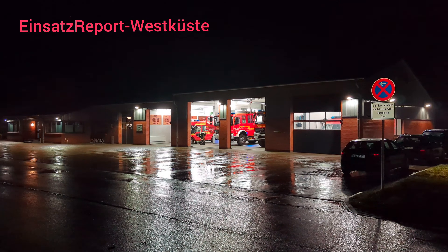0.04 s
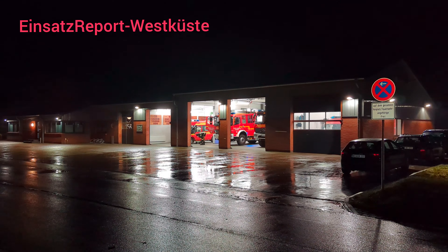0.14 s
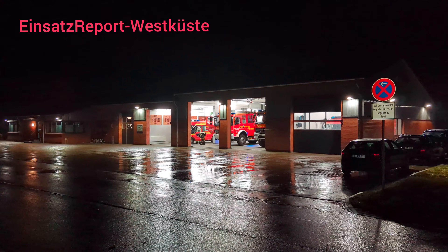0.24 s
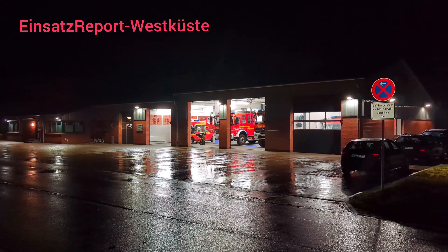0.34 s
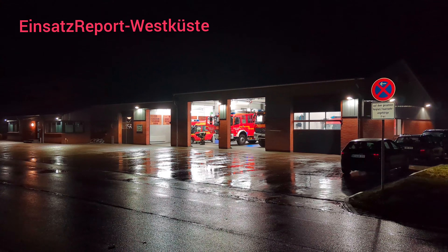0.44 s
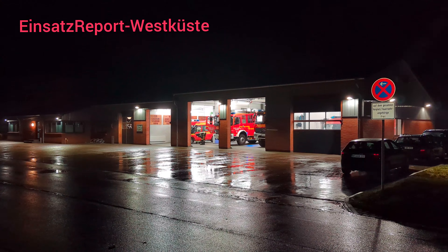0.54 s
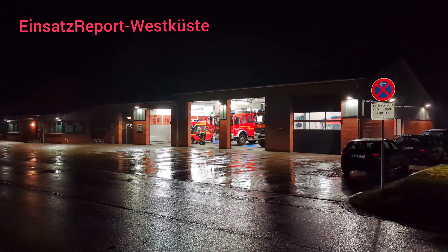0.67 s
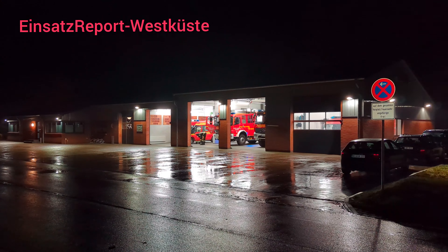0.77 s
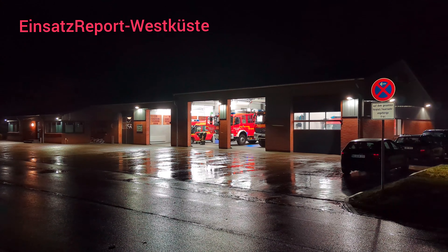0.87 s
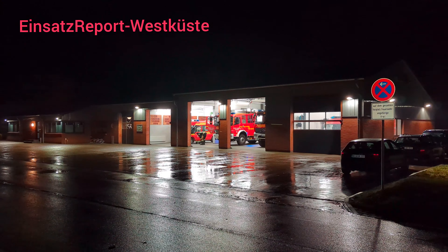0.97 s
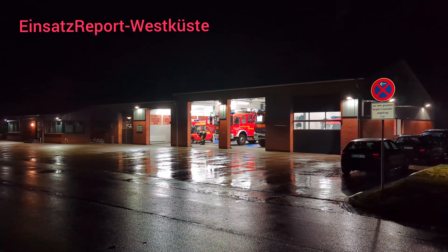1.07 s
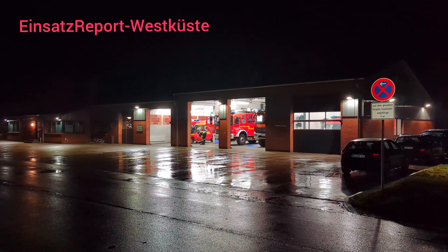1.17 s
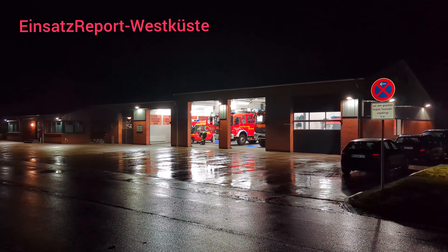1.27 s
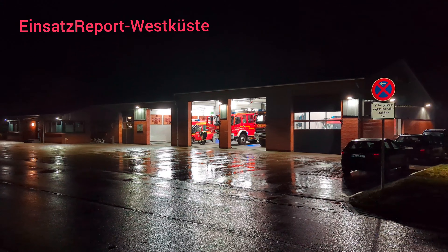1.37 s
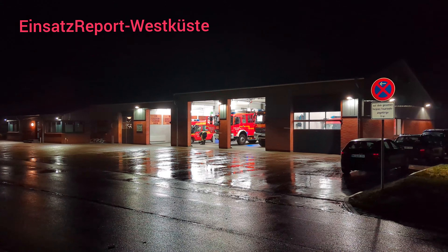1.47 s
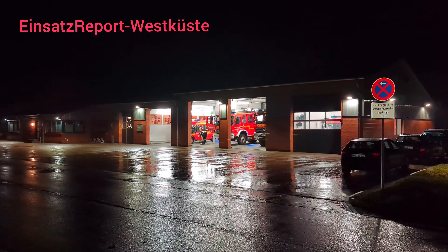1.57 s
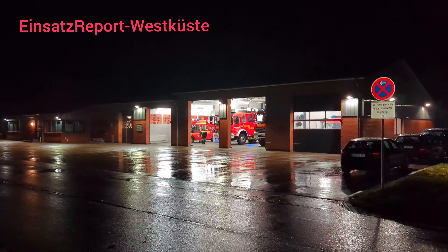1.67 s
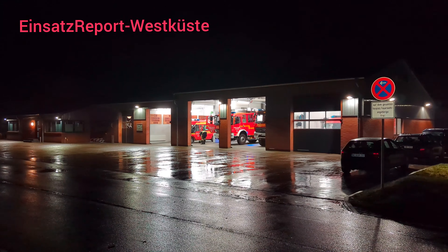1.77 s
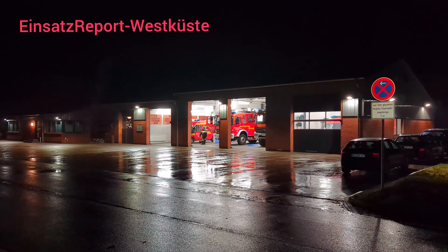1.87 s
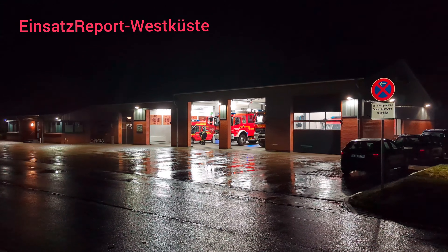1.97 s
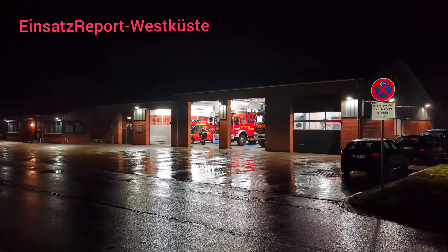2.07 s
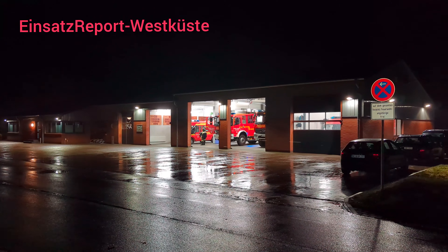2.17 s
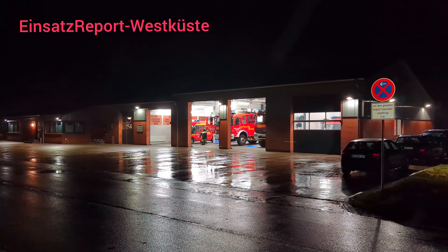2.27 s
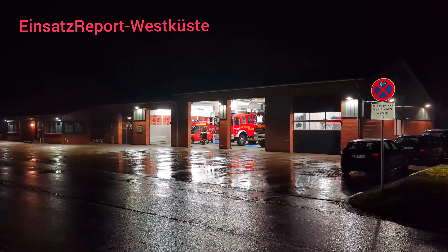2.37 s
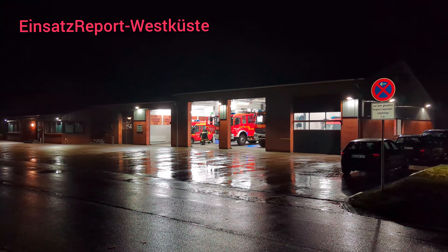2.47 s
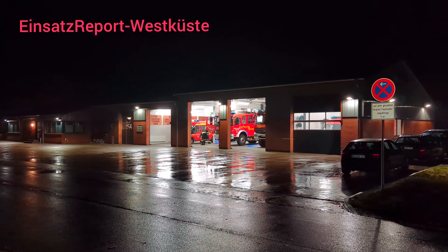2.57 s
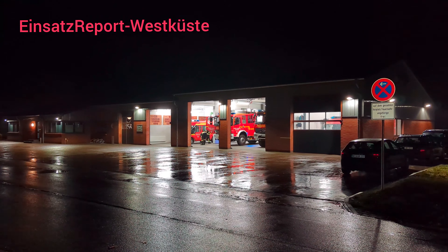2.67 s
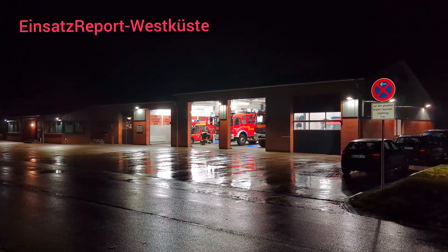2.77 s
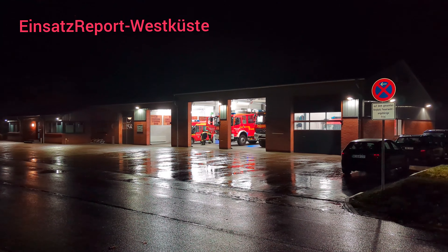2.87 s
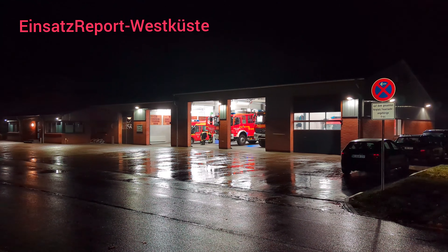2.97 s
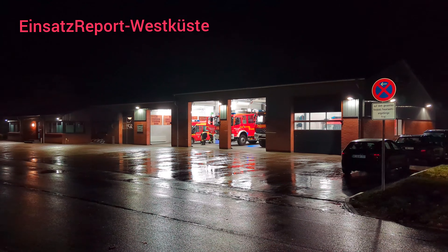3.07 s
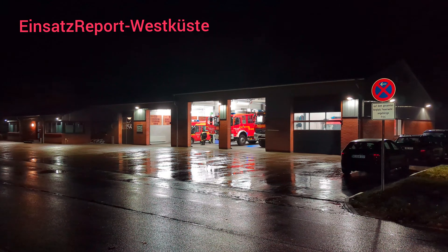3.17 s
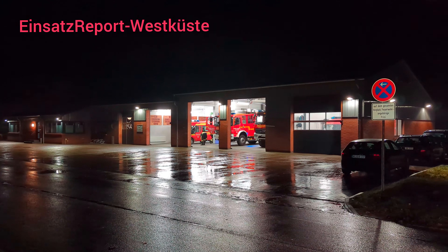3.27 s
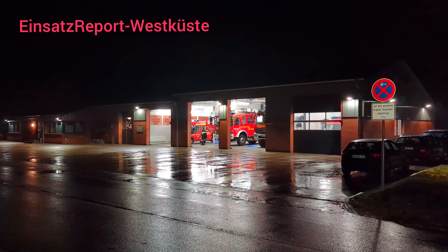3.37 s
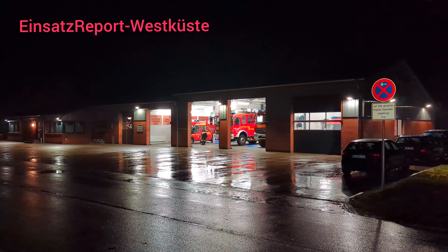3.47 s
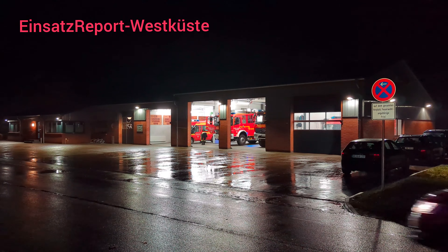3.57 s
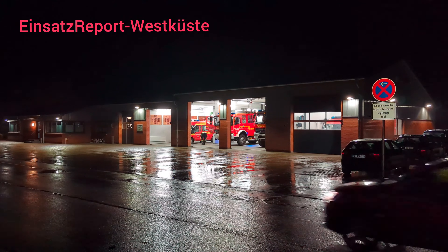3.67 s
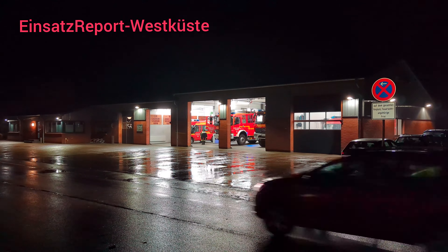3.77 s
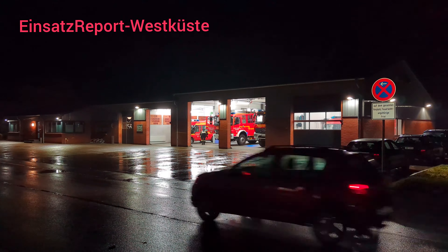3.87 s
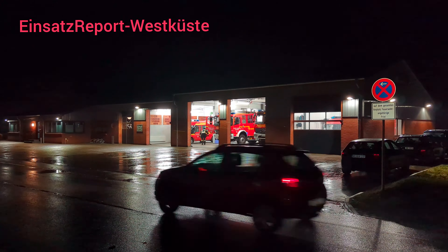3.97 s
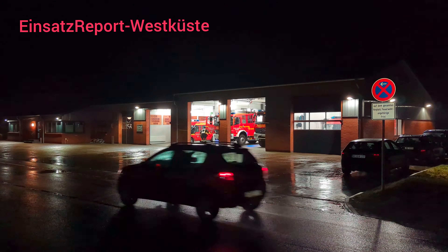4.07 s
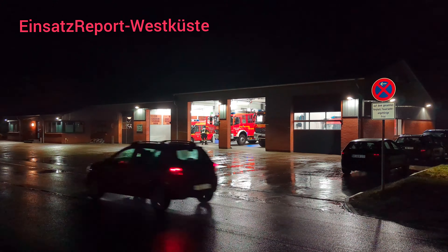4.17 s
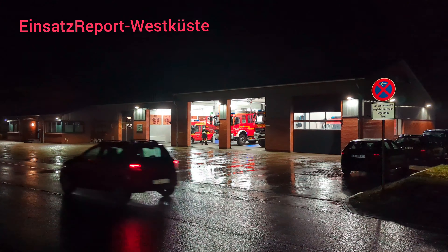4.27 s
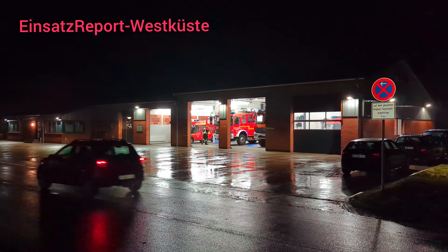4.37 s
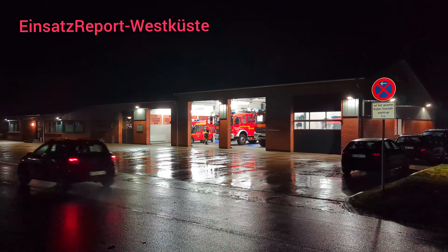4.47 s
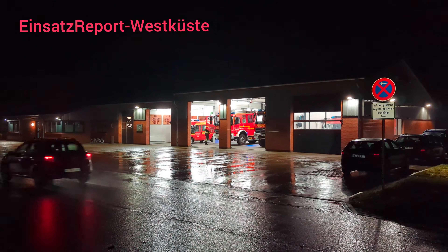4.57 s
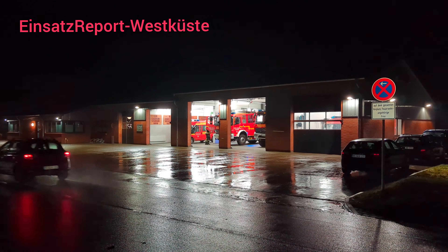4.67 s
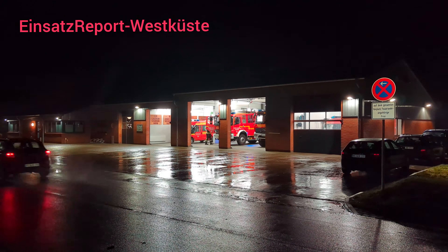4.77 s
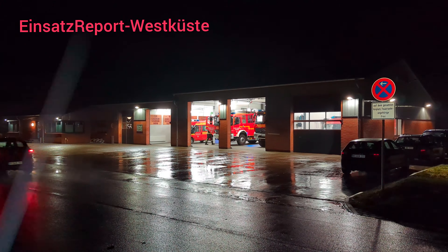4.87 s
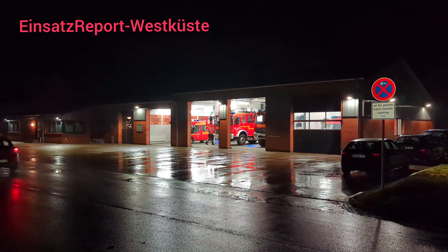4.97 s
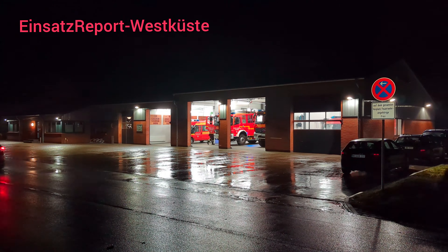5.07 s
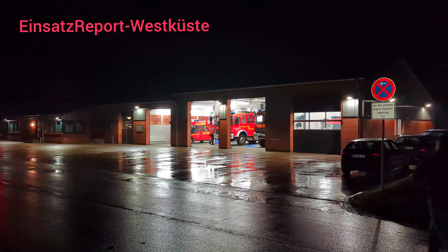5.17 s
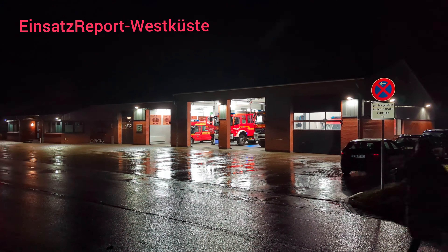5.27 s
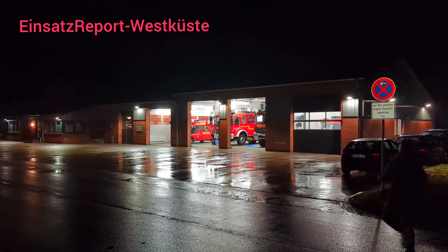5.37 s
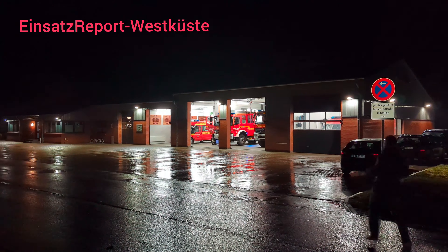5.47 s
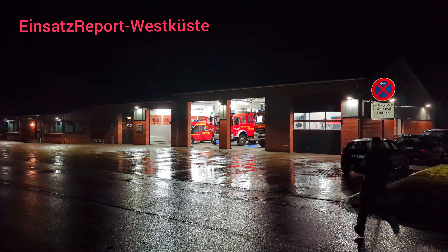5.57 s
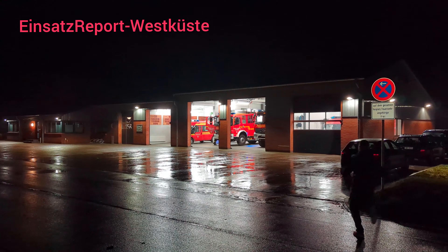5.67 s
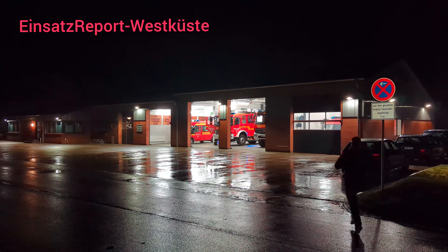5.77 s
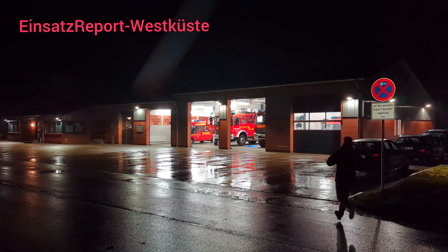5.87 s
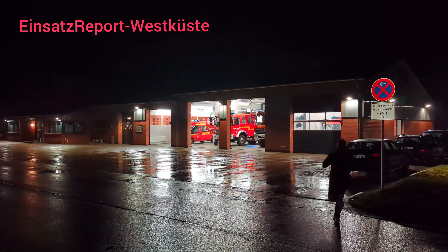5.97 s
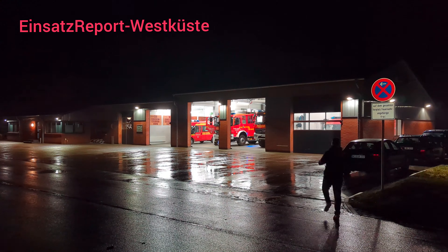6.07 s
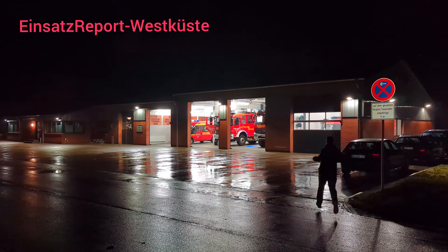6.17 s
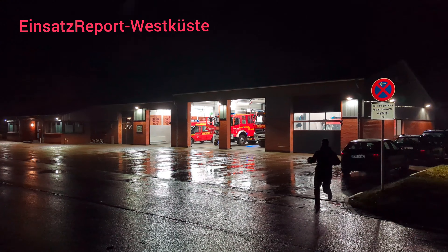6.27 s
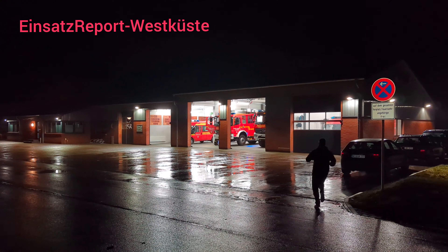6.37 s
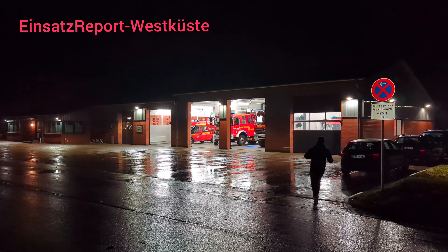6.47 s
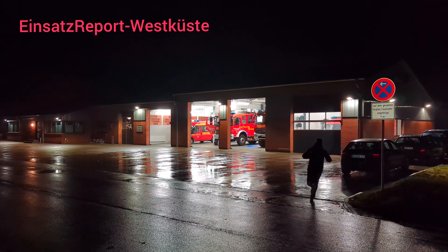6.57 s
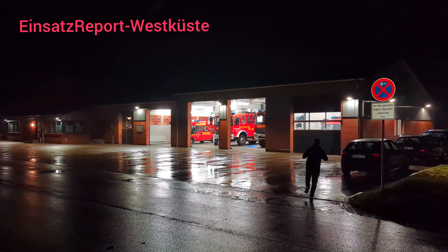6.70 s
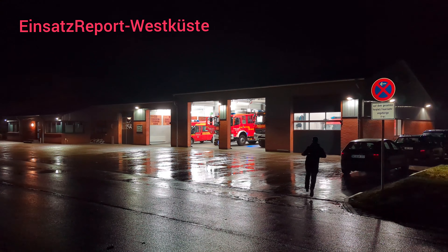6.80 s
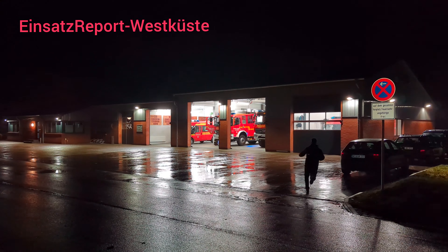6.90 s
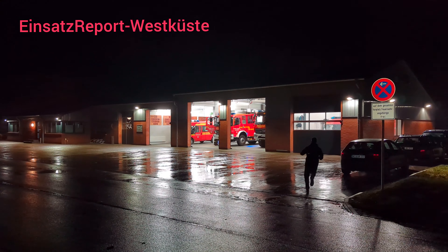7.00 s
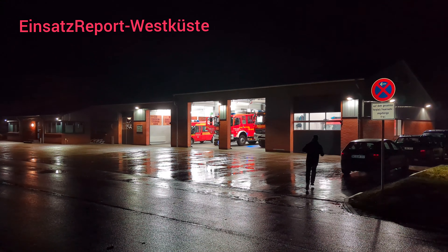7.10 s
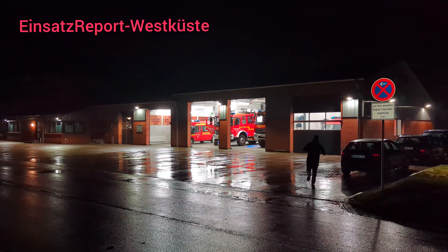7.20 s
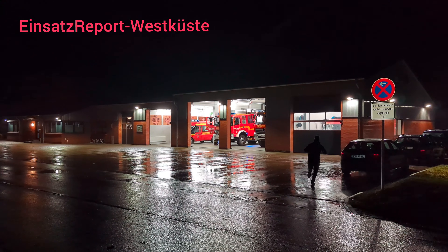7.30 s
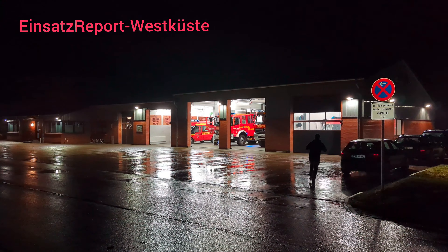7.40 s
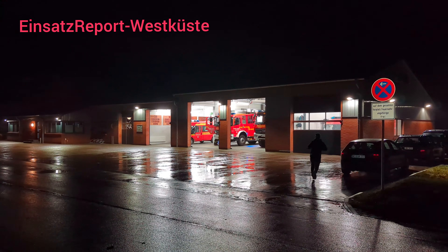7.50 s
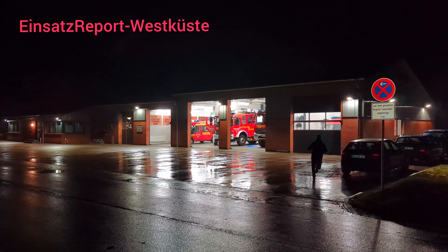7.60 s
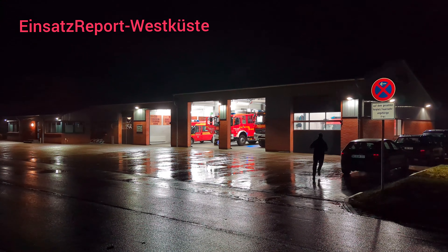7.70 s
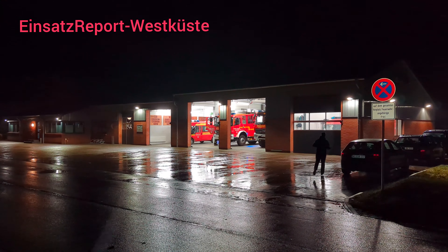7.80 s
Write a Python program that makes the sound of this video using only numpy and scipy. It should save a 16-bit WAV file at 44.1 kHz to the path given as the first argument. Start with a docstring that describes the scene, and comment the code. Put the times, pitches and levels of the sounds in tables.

```python
"""A yard beside a wet road at night: a small car comes from the right, passes and drives off to the left.
Its tyres are banded noise, roaring and throwing spray over the hum of the engine, a few sine partials.
Splashes, short bright ticks, someone jogging over wet asphalt and puffs of air are bursts of coloured noise.
A spaced pair of microphones hears it all, over a faint hum and the low rumble of the night air."""
import sys
import numpy as np
from scipy import signal
from scipy.fft import rfft, irfft
from scipy.io import wavfile
from scipy.ndimage import map_coordinates

SR = 44100
rng = np.random.default_rng(int(sys.argv[2]) if len(sys.argv) > 2 else 0)


def dump_mix(stems):
    """Bounce the given channels to the path in sys.argv[1] as a 16-bit WAV at rate SR."""
    frames = np.atleast_2d(stems).T  # one column per channel
    limited = np.clip(frames, -1, 1)  # hard clip at full scale
    pcm = np.round(limited * 32767).astype(np.int16)
    wavfile.write(sys.argv[1], SR, pcm)


N = 345920
TIME = np.arange(N) / SR
EDGES_HZ = 25 * 2 ** (np.arange(29) / 3)   # third-octave band edges
BLOCK, SWEEP_BLOCK = 32, 256   # samples per step of the tyre levels, and of the sliding filters
CUTOFF_HZ = 15800

# centres of body rumble, tread roar, water hiss and fine spray [f/Hz]
PART_HZ = [240, 1200, 4000, 10000]
# colour of the tyre noise about the levels of those parts [f/Hz, level/dB per Hz]
TYRE_COLOUR = [(25, -66), (52, -22), (100, -26), (160, -24.5), (250, -21.5), (360, -38), (480, -28.2),
               (830, -32), (1350, -29.5), (2300, -33), (3300, -34.5), (5000, -37), (8500, -36.5),
               (15000, -41.5)]
# direction of the car as a delay at the left microphone [t/s, lag/ms]
BEARING = [(0, 0.49), (2.85, .51), (3.3, .485), (3.55, 0.43), (3.75, 0.3), (3.95, .076), (4.3, -0.134),
           (5.4, -0.33), (7.84, -0.36)]
# sound straight from the car, over what the yard scatters [f/Hz, level/dB]
DIRECT = [(60, 26), (250, 23), (500, 12), (1100, 12.5), (2700, 5), (5000, 2.5), (9000, 0), (14000, -5)]
# how that balance shifts: far away, less comes straight [t/s, level/dB]
DIRECT_CHANGE = [(0, -4), (1.2, -4), (2.2, -0.5), (3.2, 1.5), (4.2, -1.5), (5.6, -4), (7.84, -5)]
# the roar swells broadside on, sags just after, and swells briefly around the lift-off
# [t/s, half length/s, level/dB]
ROAR_SWELLS = [(4.06, 0.39, 2.8), (4.72, 0.3, -2), (6.48, .17, .5)]
# wetter and drier stretches of road raise and lower hiss and spray [t/s, half length/s, level/dB]
WET_STRETCHES = [(0, 0.38, 4.3), (2.92, .15, -1.3), (3.38, .22, 1.8), (3.86, .13, 1.7), (4.24, .13, 1),
                 (4.62, .17, -2.2), (5.28, 0.24, 3.6), (6.28, 0.29, 4), (6.6, 0.08, -2.2)]
# the hiss leans left as the car draws level [t/s, half length/s, left-right level/dB]
HISS_LEAN = [(3.92, 0.17, 4.5)]
# the spray leans right as the car comes up [t/s, half length/s, left-right level/dB]
SPRAY_LEAN = [(3.1, .5, -2.5)]
# tread noise rings differently in front of the car and behind it [f/Hz, width/Hz, level/dB]
NOSE = [(313, 60, 0.5), (486, 59, 3.5), (583, 98, -2.5), (1210, 590, 0.5), (1720, 1050, 2.7),
        (5900, 2500, -1.5)]
TAIL = [(372, 61, -4.5), (492, 54, 4), (820, 95, -1), (1150, 400, 1), (2080, 700, 3.4), (2520, 400, -1.5),
        (3400, 800, 0.5), (7400, 2600, 1)]
# far away the ground cancels a sliding band [from f/Hz, to f/Hz, halfway t/s, glide/s, width/Hz, level/dB]
GROUND_DIP = [(970, 830, 4.8, .6, 410, -6.6)]
# how deep that band is; it closes while the car is near [t/s, share 0-1]
GROUND_SHADE = [(0, 1), (2.6, .85), (3.3, .45), (3.8, 0), (4.5, .2), (5.5, .55), (6.5, .7), (7.84, .65)]
# dips and peaks carved by the housing: rising at the left microphone, falling at the right
# [from f/Hz, to f/Hz, halfway t/s, glide/s, width/Hz, level/dB]
LEFT_SHADOW = [(2120, 2920, 4.45, .65, 900, -10.5), (2800, 5200, 4.65, .7, 900, 3),
               (3700, 6900, 4.45, .75, 1250, -8.5), (5000, 8400, 4.4, .7, 1400, 2.5),
               (6500, 10000, 4.15, .7, 1900, -4.7), (9200, 12000, 4.2, .5, 1900, 4.2)]
RIGHT_SHADOW = [(3750, 2350, 3.98, .39, 850, -6), (5400, 3800, 4.07, .45, 1000, 2.7),
                (8300, 5000, 3.9, .42, 1700, -9), (9000, 6500, 4.4, .45, 1100, 4),
                (10300, 7750, 4.5, .45, 1100, -8), (11300, 8750, 4.55, .4, 1000, 3.5),
                (12600, 10500, 4.7, .5, 1300, -4.5)]
# how deep they are [t/s, share 0-1]
LEFT_SHADE = [(2.5, 0), (3.2, 0.75), (4.1, 1), (4.6, 0.9), (5.3, 0.85), (6.2, .55), (7.84, .3)]
RIGHT_SHADE = [(0, 0.25), (3.3, 0.25), (3.7, .52), (4.15, 0.88), (4.6, 0.9), (5.6, .95), (7.84, 0.8)]
# the ring of the air in the tyres swells on the way in [t/s, half length/s, level/dB]
RING_SWELLS = [(2.35, .65, 6.5)]
# overtones of the exhaust [multiple of the firing rate, level/dB]
EXHAUST = [(2, -3), (3, -12.5), (4, -13.5), (7, -13.5)]
# the engine's hum swells and sags briefly [t/s, half length/s, firing tone level/dB, overtone level/dB]
HUM_SWELLS = [(.6, .1, 7, 6), (2.62, .16, -8, -2), (2.92, .13, 5, 7), (3.3, .1, 2, 7), (3.47, .06, -5, 5),
              (3.8, .11, 3.8, 0), (4.32, .1, -3, 0), (5.123, .06, -8, 1), (5.3, 0.12, 3, 3),
              (5.75, .25, 3.5, 0), (6.35, 0.087, 5, 2), (6.6, 0.12, -7, 3)]
# splashes: the tyres through a puddle, then one among the footsteps [t/s, level/dB, rise/s, decay/s]
SPLASHES = [(1.74, -52, .012, .02), (1.805, -44.5, 0.05, 0.13), (1.92, -53, .012, 0.035),
            (6.45, -48.5, .04, .04)]
# [f/Hz, level/dB per Hz], as for every burst colour below; only the shape counts
SPLASH_COLOUR = [(1500, -9), (3500, 5.5), (7500, -1.5), (12000, -10), (16000, -21)]
# short bright ticks close to the microphones [t/s, level/dB, left-right level/dB]
TICKS = [(.331, -52, 7), (.524, -59, 0), (.659, -57.5, 0), (1.319, -55.5, 4), (3.068, -46, -2)]
# bright colour of a tick [f/Hz, level/dB per Hz]
TICK_COLOUR = [(3000, -20), (7000, -2), (10000, 0), (16000, -7)]
# running shoes slap the wet asphalt [t/s, level/dB, rise/s, decay/s]
STEPS = [(6.355, -50, .006, .012), (6.644, -49, .002, .004), (6.706, -50, .003, .008),
         (6.985, -55, .018, .012), (7.005, -47.5, .006, .006), (7.333, -51, 0.022, 0.018),
         (7.661, -49, .013, .011)]
# broad colour of a slap [f/Hz, level/dB per Hz]
STEP_COLOUR = [(1000, -4), (3500, -1.5), (8000, -4), (16000, -13)]
# the soles scuff between the slaps [t/s, level/dB, rise/s, decay/s]
SCUFFS = [(6.445, -43, .02, .035), (6.55, -46, .01, .012), (6.585, -44, .004, .008),
          (6.91, -46.5, .012, .018), (7.12, -44.5, .014, .022), (7.33, -49, .02, .014)]
# duller colour of a scuff [f/Hz, level/dB per Hz]
SCUFF_COLOUR = [(900, -16), (1900, 0), (3400, -6), (6000, -21), (10000, -36)]
# puffs of air on the microphones [t/s, level/dB, rise/s, decay/s, left-right level/dB]
PUFFS = [(6.93, -37.8, 0.09, 0.3, -9.5), (6.997, -36.5, 0.02, 0.021, -10), (7.14, -38, .015, 0.026, -17),
         (7.205, -33.5, .02, 0.031, -10), (7.415, -36.5, .012, 0.03, 1), (7.755, -36.5, 0.02, 0.011, -8)]
# bassy colour of a puff [f/Hz, level/dB per Hz]
PUFF_COLOUR = [(25, -8), (50, 6), (80, 6.5), (190, -6), (300, -30), (600, -49)]
# low rumble of the night air [f/Hz, level/dB per Hz]
AIR_COLOUR = [(25, -30), (50, -1), (80, -7), (160, -12)]
AIR_DB = -53.8

# each part of the car's sound swells and fades with distance: (loudest at t/s, level/dB there,
# time until the distance has grown by 3 dB/s, loss/dB per doubling of distance in front, and behind)
RUMBLE_PASS = (3.78, -32.5, 0.18, 3.5, 3)
ROAR_PASS = (3.52, -28.4, 1.54, 9.9, 6.1)
HISS_PASS = (4.2, -31.3, 0.69, 8.9, 9.5)
SPRAY_PASS = (3.8, -41.8, .51, 10.4, 9.2)
TONE_PASS = (4, -23.3, 0.1969, 7.3, 6.6)
OVERTONE_PASS = (3.9, -32.7, .18, 6.5, 6.3)
CAVITY_PASS = (4, -41, 1.42, 10.5, 12)
LOW_WHOOSH_PASS = (3.5, -38.5, .5, 9, 18)
HIGH_WHOOSH_PASS = (3.75, -34, .4, 13, 9)
# two bands lifted by the road reflection slide down: (from f/Hz, to f/Hz, halfway t/s, glide/s)
LOW_WHOOSH = (425, 258, 3.2, .55)
HIGH_WHOOSH = (870, 470, 3.74, .29)

ABREAST_S, TURN_S = 3.77, 0.14   # the car draws level; how fast nose gives way to tail
NEAR_S = 0.59   # distance of the road over the speed of the car
# the driver lifts off: the engine runs down and the roar dies away
LIFT_OFF_S, RUN_DOWN_HZ, RUN_DOWN_S, ROAR_LOSS_DB_PER_S = 6.38, 12, .4, 6.8
FIRING_HZ, FIRING_SAG_HZ_PER_S = 61.15, .25   # as the car draws level
CAVITY_HZ, CAVITY_SAG_HZ_PER_S, DOPPLER_SHARE = 232.7, 3.2, .025
SPRAY_PAN_DB_PER_MS, HISS_LEFT_DB = 3.5, -.1   # the spray is louder in the nearer microphone
# single larger drops stand out of the spray; their level is relative to it
SPATTER_PER_S, SPATTER_DB, SPATTER_SPREAD_DB = 260, -15.5, 4.5
SPATTER_HZ = (8000, 15500)
TICK_RISE_S, TICK_DECAY_S = .003, .004


def tyres(axle_gap_s=0.19, droplet_db=2.0, roar_left_db=1.1):
    """Two axles roar and fling droplets; the yard scatters part of it back from all sides."""
    levels = tyre_levels()[:, ::BLOCK]
    lag_ms = in_time(BEARING)[0]
    nearness = from_db(2 * in_time(DIRECT_CHANGE)[0])   # a power ratio
    hiss_left_db = HISS_LEFT_DB + swells(HISS_LEAN)
    spray_left_db = -SPRAY_PAN_DB_PER_MS * lag_ms + swells(SPRAY_LEAN)
    pans = [roar_left_db, roar_left_db, hiss_left_db, spray_left_db]
    noises = rng.standard_normal((2, 4, N)) * droplets(droplet_db)
    direct, scattered = np.zeros((4, 2, N)), np.zeros((4, 2, N))
    for hz, band in bands(noises):
        # each band blends the levels of the two parts whose centres enclose it
        weights = np.array([np.interp(np.log(hz), np.log(PART_HZ), part) for part in np.eye(len(PART_HZ))])
        gain = from_db(weights @ levels + at_hz(TYRE_COLOUR, hz))
        band *= np.repeat(gain, BLOCK)[:N]
        share = 1 - 1 / (1 + from_db(2 * at_hz(DIRECT, hz)) * nearness)
        main_part = weights.argmax()
        direct[main_part] += np.sqrt(share / 2) * band[:2]
        scattered[main_part] += np.sqrt(1 - share) * band[2:]
    # the rear axle takes each bearing a moment after the front one
    lags = [np.interp(TIME + side * axle_gap_s / 2, TIME, lag_ms) for side in (1, -1)]
    straight = np.zeros((2, N))
    for k, lag in enumerate(lags):
        axle = sum(pan((part, part), left_db) for part, left_db in zip(direct[:, k], pans))
        straight += arrive(axle, lag)
    return straight + sum(pan(yard, left_db) for yard, left_db in zip(scattered, pans))


def tyre_levels():
    """Body rumble, tread roar, water hiss and fine spray, each with its own fall over distance, in dB."""
    wet = swells(WET_STRETCHES)
    roar = passing(*ROAR_PASS) + swells(ROAR_SWELLS) - ROAR_LOSS_DB_PER_S * coasting_s()
    return np.array([passing(*RUMBLE_PASS), roar, passing(*HISS_PASS) + wet, passing(*SPRAY_PASS) + wet])


def droplets(spread_db):
    """Water lands in clumps of under a millisecond: grainy in the treble, smooth in the bass; rms 1."""
    clumps = from_db(spread_db * rng.standard_normal(N // 12 + 1))
    return rms_one(np.repeat(clumps, 12)[:N])


def turning(x):
    """The listener faces the nose of the car first, then its tail, each with its own resonances."""
    return glide(ringing(x, NOSE), ringing(x, TAIL), ABREAST_S, TURN_S)


def grazing(pair):
    """Sound from far off skims the ground and loses a band."""
    return [shadowed(channel, GROUND_DIP, in_time(GROUND_SHADE)[0]) for channel in pair]


def housing(left, right):
    """The housing between the microphones carves a comb: rising on the left, falling on the right."""
    return np.array([shadowed(left, LEFT_SHADOW, in_time(LEFT_SHADE)[0]),
                     shadowed(right, RIGHT_SHADOW, in_time(RIGHT_SHADE)[0], held_back=True)])


def spatter():
    """Larger drops flung by the tyres patter on the road and the wheel arches: random band-passed clicks."""
    sizes_db = SPATTER_SPREAD_DB * np.minimum(rng.exponential(1, N), 4)
    sizes = from_db(sizes_db) * rng.choice([-1, 1], N)
    clicks = sizes * (rng.random(N) < SPATTER_PER_S / SR) + 1e-18
    treble = signal.butter(2, SPATTER_HZ, "band", fs=SR, output="sos")
    clicks = rms_one(signal.sosfilt(treble, clicks))
    spray_db = tyre_levels()[-1]
    return arrive(clicks * from_db(SPATTER_DB + spray_db), in_time(BEARING)[0])


def cavity():
    """The air inside the tyres rings: higher while the car approaches, lower as it leaves and slows."""
    past_s = TIME - ABREAST_S
    doppler = 1 - DOPPLER_SHARE * past_s / np.hypot(NEAR_S, past_s)
    hz = (CAVITY_HZ - CAVITY_SAG_HZ_PER_S * past_s) * doppler
    db = passing(*CAVITY_PASS) + swells(RING_SWELLS) - ROAR_LOSS_DB_PER_S * coasting_s()
    return resonance(hz, db, width_hz=14)


def whoosh():
    """The road reflection lifts two bands, which fall in pitch."""
    low = resonance(glide(*LOW_WHOOSH), passing(*LOW_WHOOSH_PASS), width_hz=48)
    return low + resonance(glide(*HIGH_WHOOSH), passing(*HIGH_WHOOSH_PASS), width_hz=123)


def engine(wobble=0.00439, near_waver_db=0.0, far_waver_db=2.2, left_db=1.4):
    """Firing tone and its overtones, sine partials: steady when loud, wavering when the tone is faint."""
    run_down_hz = RUN_DOWN_HZ * (1 - np.exp(-coasting_s() / RUN_DOWN_S))
    hz = FIRING_HZ - FIRING_SAG_HZ_PER_S * (TIME - ABREAST_S) - run_down_hz
    tone_db = passing(*TONE_PASS) + swells([(s, half_s, db) for s, half_s, db, _ in HUM_SWELLS])
    overtone_db = passing(*OVERTONE_PASS) + swells([(s, half_s, db) for s, half_s, _, db in HUM_SWELLS])
    phase = 2 * np.pi * np.cumsum(hz * (1 + wobble * drift(3.8))) / SR
    waver_db = np.interp(tone_db, [-50, -35], [far_waver_db, near_waver_db])
    hum = np.zeros(N)
    for k, db in [(1, tone_db)] + [(round(k), overtone_db + db) for k, db in EXHAUST]:
        level = from_db(db + waver_db * (drift(15.0) - 1 / 2))
        hum += level * np.sin(k * phase + rng.uniform(0, 2 * np.pi))
    return pan(arrive(np.sqrt(2) * hum, in_time(BEARING)[0]), left_db)


def splashes():
    """Water thrown up in grainy bursts; the part both microphones share comes from the car's bearing."""
    water = bursts(SPLASHES, SPLASH_COLOUR, alike=0.49, lag_ms=in_time(BEARING)[0])
    return water * droplets(spread_db=3.5)


def ticks():
    """Short bright ticks close to the microphones: bursts of treble a few milliseconds long."""
    rows = [(s, db, TICK_RISE_S, TICK_DECAY_S, side) for s, db, side in TICKS]
    return bursts(rows, TICK_COLOUR, alike=.2)


def runner():
    """Shoes slap the wet asphalt in grainy bursts and scuff it in smoother, duller ones."""
    slaps = bursts(STEPS, STEP_COLOUR, alike=.3) * droplets(spread_db=2.5)
    return slaps + bursts(SCUFFS, SCUFF_COLOUR, alike=.6)


def puffs():
    """Puffs of air buffet the microphones: bursts of bass, mostly stronger on the right."""
    return bursts(PUFFS, PUFF_COLOUR, alike=0.49)


def far_hum(hz=296, level_db=-60, waver_db=4.0):
    """A faint hum from across the yard: a sine of fixed pitch and wavering level."""
    return np.sqrt(2) * from_db(level_db + waver_db * drift(4.1)) * np.sin(2 * np.pi * hz * TIME)


def night_air():
    """A faint rumble of moving air, different at each microphone."""
    return from_db(AIR_DB) * np.array([coloured(AIR_COLOUR), coloured(AIR_COLOUR)])


def passing(s, db, near_s, front_db, behind_db):
    """Level in dB of a source that drives by on a straight line."""
    doublings = np.log2(np.hypot(1, (TIME - s) / near_s))
    return db - np.where(TIME < s, front_db, behind_db) * doublings


def coasting_s():
    """Time since the driver lifted off."""
    return np.maximum(TIME - LIFT_OFF_S, 0)


def swells(rows):
    """Smooth brief rises and dips, in dB."""
    return sum(db * np.exp(-((TIME - s) / half_s) ** 2) for s, half_s, db in rows)


def glide(start, end, halfway_s, glide_s):
    """A smooth move from one value to another."""
    return start + (end - start) * (1 + np.tanh((TIME - halfway_s) / glide_s)) / 2


def resonance(hz, db, width_hz):
    """A moving narrow band of the car's sound, stirred by the rough road."""
    phase = 2 * np.pi * np.cumsum(hz) / SR
    stirred = drift(width_hz) * np.cos(phase) + drift(width_hz) * np.sin(phase)
    return arrive(from_db(db) * stirred, in_time(BEARING)[0])


def ringing(x, rows):
    """Fixed peaks and dips, one filter after the other."""
    for hz, width_hz, db in rows:
        turn, loss, g = -2 * np.cos(2 * np.pi * hz / SR), np.tan(np.pi * width_hz / SR), from_db(db / 2)
        x = signal.lfilter([1 + loss * g, turn, 1 - loss * g], [1 + loss / g, turn, 1 - loss / g], x)
    return x


def shadowed(x, rows, shade, held_back=False):
    """Dips and peaks slide in pitch and deepen with the shade; the first may hold sound back by a cycle."""
    for k, (from_hz, to_hz, halfway_s, glide_s, width_hz, db) in enumerate(rows):
        out, state, loss = np.zeros(N), np.zeros(2), np.tan(np.pi * width_hz / SR)
        full = from_db(db) * (-1 if held_back and k == 0 else 1)   # gain at the centre in full shade
        depths = loss * (1 + np.clip(shade[::SWEEP_BLOCK], 0, 1) * (full - 1))
        centre_hz = glide(from_hz, to_hz, halfway_s, glide_s)[::SWEEP_BLOCK]
        turns = -2 * np.cos(2 * np.pi * centre_hz / SR)
        for i, depth, turn in zip(range(0, N, SWEEP_BLOCK), depths, turns):
            block = slice(i, i + SWEEP_BLOCK)
            feed, back = [1 + depth, turn, 1 - depth], [1 + loss, turn, 1 - loss]
            out[block], state = signal.lfilter(feed, back, x[block], zi=state)
        x = out
    return x


def bursts(rows, colour, alike, lag_ms=0):
    """Noise that swells quickly and dies away, partly alike in the two microphones."""
    alike = np.clip(alike, 0, 1)
    shared = arrive(coloured(colour), lag_ms)
    separate = np.array([coloured(colour), coloured(colour)])
    noise = np.sqrt(alike) * shared + np.sqrt(1 - alike) * separate
    out = np.zeros((2, N))
    for s, db, rise, decay, *side in rows:
        near = np.abs(TIME - s) < 1
        age = TIME[near] - s
        swell = np.exp(-np.minimum(np.where(age < 0, (age / rise) ** 2, age / decay), 20))
        out[:, near] += pan(noise[:, near] * swell * from_db(db), sum(side))
    return out


def arrive(x, lag_ms):
    """Sound reaches the left microphone later than the right by the lag, split evenly between them."""
    half = lag_ms * SR / 2000   # samples
    pair = np.broadcast_to(x, (2, N))
    return np.array([map_coordinates(channel, [np.arange(N) + side * half], order=3, mode="nearest")
                     for channel, side in zip(pair, (-1, 1))])


def pan(x, left_db):
    """Tips the level between left and right."""
    g = from_db(left_db / 2)
    return np.array([x[0] * g, x[1] / g])


def bands(noises):
    """Third-octave bands (centre Hz, sound), dealt in turn from two unrelated noises; unit power per Hz."""
    for k, (low, high) in enumerate(zip(EDGES_HZ, EDGES_HZ[1:])):
        sos = signal.butter(2, [low, high], "band", fs=SR, output="sos")
        yield np.sqrt(low * high), signal.sosfilt(sos, noises[k % 2]) * np.sqrt(SR / 2)


def coloured(colour):
    """One channel of noise with the given colour; rms 1."""
    hz = np.maximum(np.fft.rfftfreq(N, 1 / SR), 1)
    outside = (hz < colour[0][0] / 2) | (hz > colour[-1][0] * 2)
    spectrum = rfft(rng.standard_normal(N)) * from_db(at_hz(colour, hz)) * ~outside
    return rms_one(irfft(spectrum, N))


def drift(rate):
    """Slow chance with a spread of 1: low-passed noise, drawn every 40 samples and joined by lines."""
    r = np.exp(-80 * np.pi * rate / SR)
    slow = signal.lfilter([1], [1, -2 * r, r * r], rng.standard_normal(N // 40 + 2002))
    slow = slow[2000:]   # skip the filter's settling
    return np.interp(np.arange(N) / 40, np.arange(len(slow)), rms_one(slow))


def in_time(rows):
    """Each column of a curve, at every sample."""
    s, *columns = np.transpose(rows)
    return [np.interp(TIME, s, c) for c in columns]


def at_hz(points, hz):
    """A spectrum read on a log-frequency axis."""
    point_hz, db = np.transpose(points)
    return np.interp(np.log(hz), np.log(point_hz), db)


def from_db(db):
    """Amplitude ratio of a level in dB."""
    return np.exp(np.asarray(db) * np.log(10) / 20)


def rms_one(x):
    """Scales a signal to rms 1."""
    return x / np.sqrt(np.mean(x ** 2) + 1e-20)


def scene():
    """The car, the splashes, the ticks, the runner and the air."""
    road_noise = housing(*grazing(turning(tyres())))
    car = road_noise + spatter() + cavity() + whoosh() + engine()
    return car + splashes() + ticks() + runner() + puffs() + far_hum() + night_air()


def record(dry):
    """A steep low-pass cuts the top."""
    return signal.sosfilt(signal.ellip(12, .1, 90, CUTOFF_HZ, fs=SR, output="sos"), dry)


dry = scene()
out = record(dry)
dump_mix(out)
```